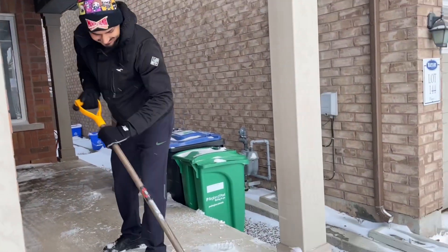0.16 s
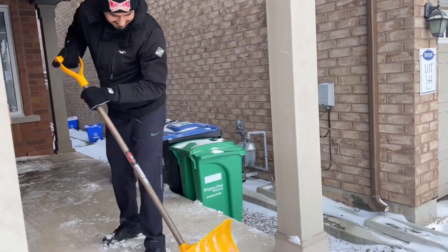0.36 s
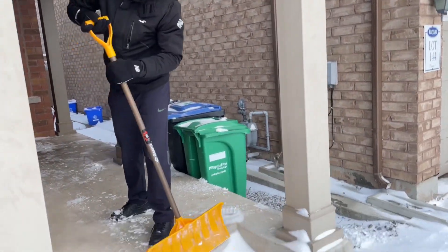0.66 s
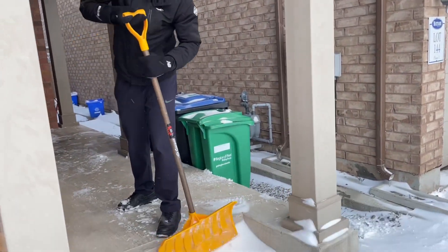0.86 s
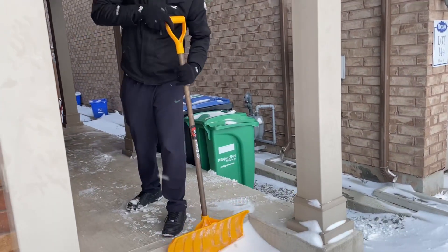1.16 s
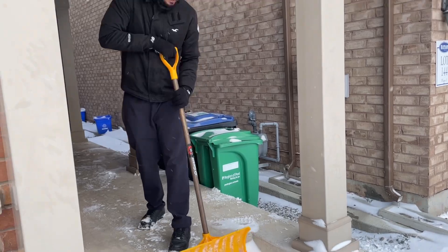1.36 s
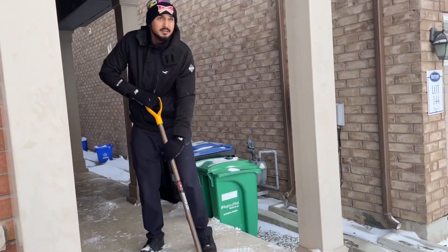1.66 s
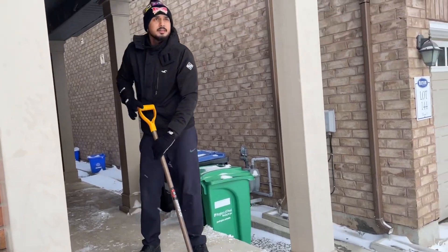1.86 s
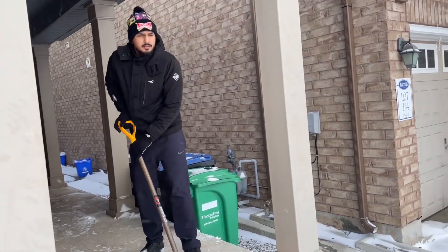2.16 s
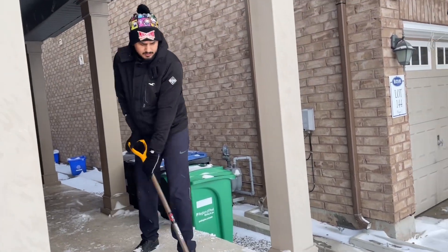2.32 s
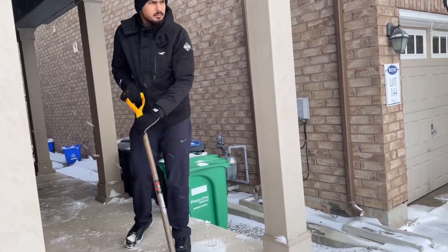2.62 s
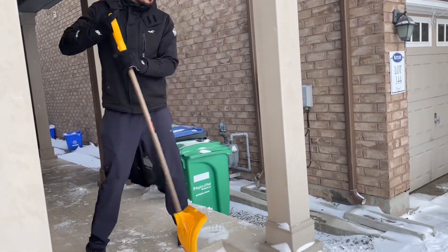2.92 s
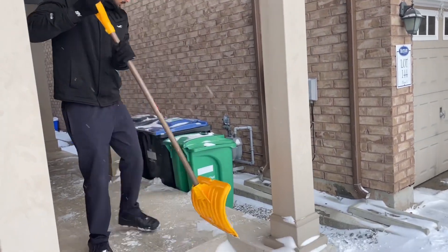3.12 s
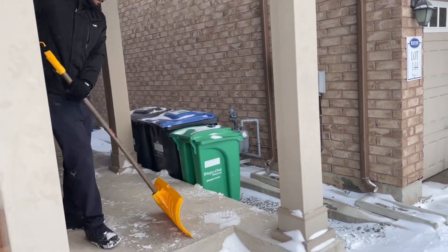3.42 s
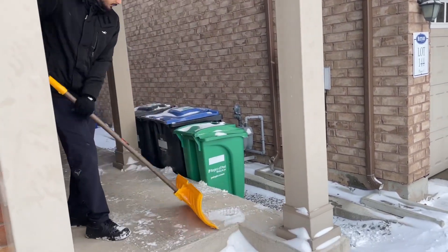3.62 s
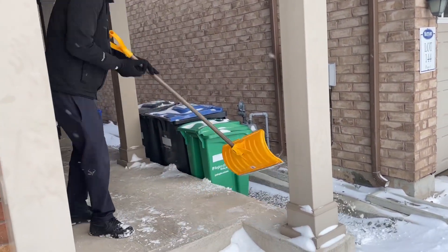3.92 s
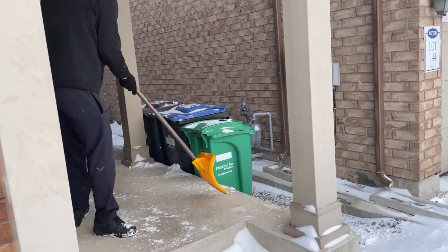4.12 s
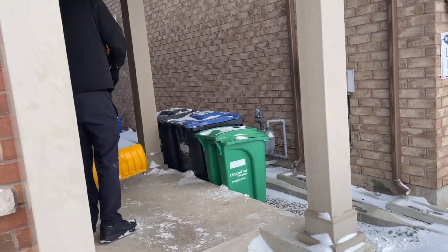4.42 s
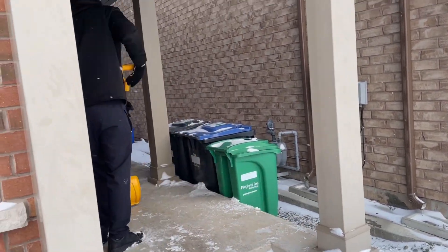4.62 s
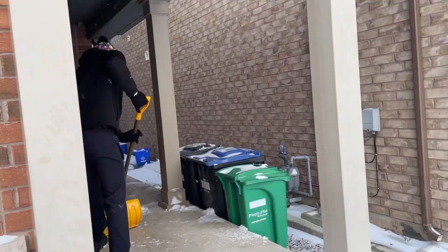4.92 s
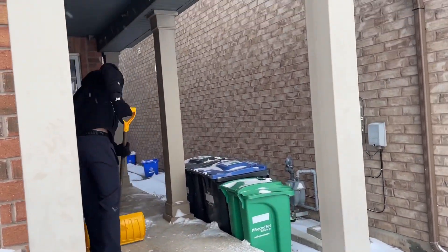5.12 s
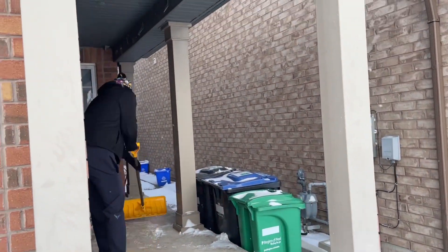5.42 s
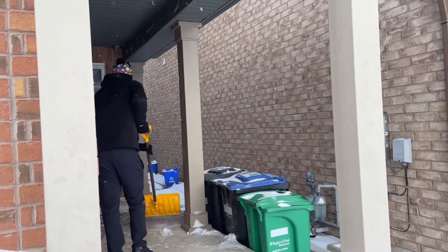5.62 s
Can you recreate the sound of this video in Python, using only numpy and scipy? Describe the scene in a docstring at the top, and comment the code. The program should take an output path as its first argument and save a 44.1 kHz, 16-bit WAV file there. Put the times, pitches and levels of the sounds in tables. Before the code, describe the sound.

Wind rumbles, flutters and pops on the microphone from the start, strongest in the first second, then returning in weaker gusts. At about 0.6 seconds a plastic snow shovel hits icy concrete with a sharp, bouncing clatter, and knocks again at 0.8. Short gritty scrapes and clacks follow near 1.5, 2.3 and 2.9 seconds. A knock at 3.4 leads into a longer, brighter scrape until about 3.8. The lifted scoop hums briefly after these last two strokes. Another knock comes at 4.1, then a run of lighter hollow taps from 4.5, running into scrapes around 4.8 and 5.2 to 5.4. A last clack and short scrape land at 5.7. The brick walls of the porch add a brief, slight echo. In the background lies a faint street hush, with small hanging metal parts tinkling far off, mostly in the first half.

```python
"""A plastic snow shovel knocks, bounces and scrapes in short strokes over gritty ice on a concrete porch.
Blows and catching grit make the blade ring, the lifted scoop hums, and brick walls echo briefly.
Gusts of wind rumble, flutter and pop on the microphone.
Far off, small hanging metal parts tinkle over the hush of a street."""
import sys
import numpy as np
from scipy import signal
from scipy.fft import rfft, irfft, next_fast_len
from scipy.io import wavfile
from scipy.ndimage import uniform_filter1d, map_coordinates

SR = 44100
rng = np.random.default_rng(int(sys.argv[2]) if len(sys.argv) > 2 else 0)


def dump_mix(stems):
    """Bounce the given channels to the path in sys.argv[1] as a 16-bit WAV at rate SR."""
    frames = np.atleast_2d(stems).T  # one column per channel
    limited = np.clip(frames, -1, 1)  # hard clip at full scale
    pcm = np.round(limited * 32767).astype(np.int16)
    wavfile.write(sys.argv[1], SR, pcm)


N = 254456


def amp(db):
    """Turn decibels into a factor to multiply by."""
    return 10 ** (np.asarray(db) / 20)


def unit(x):
    """Scale a signal to an average power of 1."""
    return x / np.sqrt(np.mean(x ** 2) + 1e-20)


def along(points, hz):
    """Read between (frequency, value) points on a log frequency axis."""
    freqs, values = np.transpose(points)
    return np.interp(np.log(hz + 1), np.log(freqs + 1), values)


def wobble(rate):
    """A smooth random curve for each channel, mostly shared; rate is random points per second."""
    knots = rng.standard_normal((3, int(N * rate / SR) + 4))
    shared, left, right = (map_coordinates(k, [np.arange(N) * rate / SR]) for k in knots)
    return 0.66 * shared + 0.46 * np.array([left, right])


def filtered(x, response):
    """Multiply each frequency in x by response(hz)."""
    size = next_fast_len(N + SR // 2)
    return irfft(rfft(x, size) * response(np.fft.rfftfreq(size, 1 / SR)), size)[..., :N]


def stereo_noise(likeness):
    """White noise from rows of (frequency [Hz], left-right likeness [0 to 1])."""
    def mid_and_side(hz):
        angle = np.arccos(np.clip(along(likeness, hz), -1, 1)) / 2
        return np.array([np.cos(angle), np.sin(angle)])
    mid, side = filtered(rng.standard_normal((2, N)), mid_and_side)
    return np.array([mid + side, mid - side])


def street_hush():
    """Far street noise, gently unsteady."""
    # tone of the street: (frequency [Hz], level [dB])
    spectrum = [(30, 0.5), (60, -11.5), (140, 6), (300, -9.5), (600, -20), (1200, -15), (1800, -23.5),
                (1950, -11.5), (2100, -25), (3000, -28), (4500, -36), (8000, -46), (12500, -38.5),
                (15000, -39.5)]
    # how alike the two sides sound: (frequency [Hz], likeness [0 to 1])
    likeness = [(60, 0.31), (300, 0.34), (640, 0.25), (1400, 0.18), (7000, 0.036), (15000, 0.41)]
    level = amp(-53 + 3.7 * wobble(1))
    return level * unit(filtered(stereo_noise(likeness), lambda hz: amp(along(spectrum, hz))))


def metal_tinkle():
    """Hanging metal parts touch in the wind; each touch rings one thin tone from its own side."""
    # metal parts: (pitch [Hz], time to fade 60 dB [s], touches as (time [s], level [dB]))
    parts = [(1870, 2, [(0, -67), (.5, -67), (2.56, -67), (4.25, -64)]), (2820, 2, [(0, -72), (.45, -71)]),
             (3410, 1.1, [(0, -66.5), (.36, -69), (.51, -66), (.86, -64), (1.29, -69), (1.67, -68),
             (1.97, -71), (3.105, -70), (3.2, -68)]), (5000, 0.65, [(.73, -55), (.85, -56), (1.81, -66),
             (2.745, -77), (4.4, -73.5)]), (6530, .33, [(0, -56.5), (.915, -46.5), (2.975, -60),
             (4.212, -63)]), (8810, .4, [(.52, -73.5), (1.15, -62), (3.11, -64)])]
    out, t = np.zeros((2, N + SR)), np.arange(SR) / SR
    attack = 1 - np.exp(-t / 0.0026)
    for hz, t60, touches in parts:
        for start, db in touches:
            pan_db, phase = rng.standard_normal(2)
            level = amp(db - 60 * t / t60 + [[pan_db], [-pan_db]]) * attack
            out[:, round(start * SR):][:, :SR] += level * np.sin(2 * np.pi * hz * t + [[0], [phase]])
    return out[:, :N] * amp(4.5 * wobble(40))  # the swinging parts waver


def wind_gusts():
    """Swirls of air press on the microphone in lumps: a low rumble and a higher flutter."""
    # gusts: (time at full strength [s], hold [s], rumble [dB], flutter [dB])
    gusts = [(0.003, 0.046, -20, -20), (0.075, 0.13, -30.5, -32), (0.207, 0.035, -26, -29.5),
             (0.315, 0.036, -21.5, -25.5), (0.442, .01, -33, -39.5), (0.507, 0.038, -32.5, -43),
             (0.604, .05, -26, -19.5), (0.685, .05, -29, -30.5), (0.752, 0.11, -22, -21),
             (0.961, 0.044, -19.5, -22.5), (1.073, 0.021, -29.5, -39.5), (1.145, 0.037, -41, -49.5),
             (1.331, 0.15, -41, -48.5), (1.468, 0.024, -41, -31.5), (1.613, .13, -32.5, -25.5),
             (1.78, 0.078, -44, -36.5), (1.872, 0.012, -31.5, -41), (2.011, 0.054, -36.5, -30),
             (2.134, .09, -45, -35), (2.447, 0.073, -25.5, -27), (2.551, 0.069, -44.5, -44.5),
             (2.664, 0.19, -37.5, -30.5), (2.954, 0.049, -52, -41), (3.056, .03, -35, -46.5),
             (3.151, 0.061, -48.5, -50), (3.257, 0.0054, -33.5, -28.5), (3.319, 0.078, -37.5, -29.5),
             (3.463, 0.053, -32.5, -38), (3.574, 0.037, -31.5, -29), (3.664, 0.02, -51, -47),
             (4.17, 0.0081, -48.5, -52.5), (4.396, 0.044, -38.5, -40), (4.634, 0.0057, -31.5, -37),
             (4.737, .07, -38.5, -37), (5.506, 0.022, -59, -63), (5.651, 0.016, -49.5, -67),
             (5.732, 0.052, -45.5, -42)]
    # tone of the rumble and of the flutter: (frequency [Hz], level [dB])
    rumble_tone = [(15, -53.5), (35, -4.5), (55, 11.5), (110, 12), (160, 12.5), (250, -30), (400, -48),
                   (800, -120)]
    flutter_tone = [(90, -25.5), (180, 5), (300, -3.5), (450, -7.5), (700, -25.5), (1200, -46.5),
                    (2500, -120)]
    rise_db_per_s, fall_db_per_s = 590, 394
    t, power = np.arange(N) / SR, 0
    for full, hold, rumble_db, flutter_db in gusts:
        drop_db = rise_db_per_s * np.maximum(full - t, 0) + fall_db_per_s * np.maximum(t - full - hold, 0)
        power += amp([[rumble_db], [flutter_db]] - drop_db) ** 2
    level = uniform_filter1d(np.sqrt(power), size=400, axis=1)
    rumble = level[0] * unit(stereo_noise([(60, 0.83)]) * amp(4.1 * wobble(28)))
    flutter = level[1] * unit(stereo_noise([(60, 0.67)]) * amp(4.9 * wobble(50)))
    return (filtered(rumble, lambda hz: unit(amp(along(rumble_tone, hz))))
            + filtered(flutter, lambda hz: unit(amp(along(flutter_tone, hz)))))


def wind_pops():
    """The strongest swirls pop on the microphone with a falling pitch."""
    # pops: (time [s], level [dB], pitch [Hz])
    pops = [(0.026, -20, 360), (0.056, -34, 350), (0.088, -25, 307), (0.117, -18.5, 283),
            (0.144, -20.5, 316), (0.2, -16.5, 325), (0.305, -5, 545), (0.321, -18.5, 480),
            (0.341, -11.5, 301), (0.453, -22.5, 294), (0.962, -11.5, 343), (1.614, -18, 295),
            (1.729, -17, 350), (2.028, -23.5, 370), (2.443, -21, 320), (2.746, -18.5, 330),
            (4.427, -21, 192), (4.62, -39, 280)]
    out, lead = np.zeros((2, N)), SR // 50
    t = np.arange(-lead, SR // 25) / SR
    for time, db, hz in pops:
        cycles = t * hz
        level = amp(db) * np.exp(-np.where(cycles < 0, 1.9 * cycles ** 2, 1.4 * cycles))
        pop = level * np.sin(2 * np.pi * (cycles - 0.045 * cycles * np.abs(cycles)))
        pan = amp(rng.normal(0, 8.1) * np.array([[0.5], [-0.5]]))
        out[:, round((time + 0.003) * SR) - lead:][:, :len(t)] += pop * pan
    return out


# The shovel sounds in five bands, low to high: hollow, boom, grind, rasp, fizz.
def drag_power():
    """Power in each band as the blade drags lightly through loose snow."""
    # dragging: (time [s], grind [dB], boom over grind [dB])
    drags = [(0.02, -67, -2), (0.222, -54, -12), (0.58, -74, 8), (0.634, -39, 18), (0.758, -42, -6),
             (0.83, -32, -10), (0.9, -38, -5.5), (1.14, -56, -1), (1.21, -54, 6.5), (1.27, -60, -1),
             (1.37, -54, 7.5), (1.6, -49.5, 7), (1.7, -48, -5), (1.866, -59, -15), (2.0, -54, -11),
             (2.19, -67, 4), (2.584, -64.5, 2), (2.8, -92, 19), (3.0, -57, 1), (3.064, -70, 0),
             (3.274, -53.5, -12), (3.4, -61.5, 7), (3.86, -48, -7), (4.06, -77, 10), (4.46, -65.5, -10),
             (4.5, -53, -5), (4.62, -54, -19), (4.732, -44.5, 6), (5.05, -60.5, 7), (5.45, -43, -10.5),
             (5.572, -49, -14), (5.68, -66, -1)]
    times, *columns = np.transpose(drags)
    grind_db, boom_db = (np.interp(np.arange(N) / SR, times, column) for column in columns)
    fizz_db = (0.84 - 1) * (grind_db - grind_db.mean()) - 11  # fizz gains 0.84 dB per dB of grind
    bands_db = np.array([boom_db - 8, boom_db, np.full(N, -3.5), np.full(N, -13), fizz_db])
    return amp(grind_db + bands_db) ** 2


def patchy(x):
    """Narrow random patches of pitch swell and fade in the scrape, alike on both channels."""
    spectrum = signal.stft(x, nperseg=1024)[2]
    patches = uniform_filter1d(rng.standard_normal(spectrum.shape[1:]), size=2, axis=0)
    patches = uniform_filter1d(patches, size=8, axis=1)  # narrow in pitch, slow in time
    return signal.istft(spectrum * amp(2.5 * unit(patches)), nperseg=1024)[1][:, :N]


def resonances(table, top_hz):
    """A filter that rings at the pitches in the table and dulls above top_hz."""
    def response(hz):
        ringing = sum((-1) ** k * amp(db) * 1j * hz * width / (pitch ** 2 - hz ** 2 + 1j * hz * width)
                      for k, (pitch, width, db) in enumerate(table))
        return ringing / (1 + 1j * hz / top_hz) ** 2
    return response


def shovel():
    """Grit catches the edge in dense, uneven grains that ring the blade; blows ring it at once."""
    # resonances of the scoop, bending blade, edge and ribs: (pitch [Hz], width [Hz], level [dB])
    hollow = [(195.3, 51, -8), (291.3, 82, 2.5), (381, 167, 1)]
    boom = [(550, 110, -5.5), (667.3, 44.4, 3.5), (743, 70, 0), (800, 53, 2.5), (950, 106, -5)]
    grind = [(1060, 204, 5), (1249, 20.6, 4.5), (1247, 254, 1.5), (1457, 22, 7), (1536, 69, 2),
             (1736, 98, 9), (1987, 610, 3.5)]
    rasp = [(2244, 71, -1), (2415, 76, 5.5), (2670, 290, 2), (3023, 110, 3.5), (3233, 68, 2),
            (3377, 69, -0.5), (3590, 640, -7)]
    # tone of the ice: (frequency [Hz], level [dB])
    fizz = [(2000, -33.5), (3500, 2), (5200, 1), (6500, -1.5), (8500, -5), (10000, -1), (12300, -5.5),
            (14300, -14.5), (15600, -33)]
    # how alike the two sides sound: (frequency [Hz], likeness [0 to 1])
    likeness = [(300, 0.88), (640, 0.59), (1400, 0.08), (3000, 0.23), (7000, 0.33), (15000, 0.63)]
    # stereo balance: (frequency [Hz], left over right [dB])
    balance = [(300, -0.5), (700, 2.5), (1300, 2.5), (2400, -2.2), (4400, 3), (8000, -0.2)]
    right_delay_s = 0.00016
    crunch_power, blows = blade_knocks()
    force = np.sqrt(drag_power() + crunch_power + scrape_power())
    grit = amp(1.34 * wobble(250) + 1.05 * wobble(45))
    bands = [resonances(hollow, top_hz=490), resonances(boom, top_hz=900), resonances(grind, top_hz=4300),
             resonances(rasp, top_hz=7500), lambda hz: amp(along(fizz, hz))]
    blade = 0
    for push, blow, band in zip(force, blows, bands):
        grains = unit(grit * patchy(stereo_noise(likeness)))
        blade += filtered(push * grains + blow, band) / np.std(filtered(grains, band))
    return filtered(blade, lambda hz: amp(along(balance, hz) * [[0.5], [-0.5]])
                    * np.exp(-2j * np.pi * hz * [[0], [right_delay_s]]))


def wall_echo(x):
    """Brick walls answer briefly, each frequency dying at its own speed."""
    # echo of the porch: (frequency [Hz], time to fade 60 dB [s])
    fade_times = [(200, 0.39), (1000, 0.19), (4000, 0.21), (12000, 0.2)]
    hz, t, noise = signal.stft(rng.standard_normal((2, SR // 2)), SR, nperseg=256)
    tail = signal.istft(noise * amp(-60 * t / along(fade_times, hz)[:, None]), SR, nperseg=256)[1]
    return signal.fftconvolve(x, tail / np.linalg.norm(tail[0]), axes=1)[:, :N]


def blade_knocks():
    """The blade hits the ground: the power of the crunch and the sharp blows, in each band."""
    # knocks: (time [s], level [dB], hollow [dB], boom [dB], treble [dB], snow crunch before the blow [dB],
    # base fade time [s]); the four dB columns after level add to it
    knocks = [(0.5881, -8, -34, -1.5, -4, -51, 0.1), (0.6, -12, -28.5, 2, -4.5, -20, 0.16),
              (0.6104, -14.5, -4.5, -2, -21, -24, .12), (0.6407, -22.5, -6, 7.5, 3, -27, .061),
              (0.6504, -31.5, -6, 7, -2, -33.5, .079), (0.6723, -16, -5, -11, 2, -24, 0.063),
              (0.8135, -12, -12.5, -6.5, 0, -35, 0.056), (0.8214, -24.5, 5.5, 5, -12, -23, .09),
              (0.8344, -31, -7, 0, 11.5, -31, .05), (1.0434, -39, -4, 6, 2, -29, 0.071),
              (1.3972, -34, 2.5, -6, 0.5, -25, 0.25), (1.4456, -22, 2, 1.5, -1, -25, 0.026),
              (1.4875, -39, 10.5, -7, 6.5, -25, 0.04), (1.5267, -33, -18, -1, -7, -20, 0.039),
              (1.5542, -18, -12, -18, -1.5, -23.5, .056), (1.9066, -47.5, 9, -1, 9.5, -10, 0.49),
              (1.9827, -45, 8, -2, 7, -23, 0.072), (2.0243, -55.5, 0, -3, 13.5, -25, .06),
              (2.0657, -49.5, -3, 2, 8, -33, 0.059), (2.1958, -41.5, 15, 8, 1.5, -27, 0.13),
              (2.2167, -35, 0, 6.5, 1, -32, 0.1), (2.2613, -32, 4, 11.5, -11, -18, 0.078),
              (2.4626, -24, 1, -1, 5.5, -7, 0.056), (2.8644, -28, -13, -2.5, 4.5, -25, 0.083),
              (2.9137, -16, -7.5, -5, 5.5, -9, .09), (3.0694, -56.5, -3, -1, 10, -1, 0.12),
              (3.262, -57, 0, -1, 13.5, -8, .1), (3.4319, -11.5, -16, -10.5, 6.5, -6, 0.029),
              (3.4865, -30.5, -2, -5, 10.5, -13, 0.11), (3.607, -31, 0, 1.5, 10.5, -26, 0.16),
              (3.9741, -53.5, -1, -14.5, 7.5, -29, 0.14), (4.086, -17, -5.5, -8, 2, -0.5, 0.072),
              (4.2118, -55.5, -7, -6, 10, -21, 0.35), (4.3694, -61, -5, -3, 11.5, -21, 0.19),
              (4.5452, -23, 2.5, -1.5, 3.5, -11, .12), (4.6552, -28, -2, 0, 3, -8, 0.13),
              (4.6752, -26, -1, -0.5, 1.5, -21, 0.13), (4.7125, -28, 2, -1, -1, -23, 0.094),
              (4.7435, -31.5, 4, 0, -13, -25, 0.17), (4.8202, -31, 8, 0, -3, -28, 0.12),
              (5.068, -45.5, 11.5, 4, -7, -25, 0.13), (5.139, -49.5, 0, -1.5, 13.5, -25, .06),
              (5.7249, -16.5, -24, -24, -2.5, -19, .097)]
    # boost of the sharp blow in each band: (level [dB])
    clack_db = [20.2, 22.3, 19, 22, 19.97]
    fade_share = np.array([[1.4], [1.2], [1], [0.8], [0.55]])  # the treble dies first
    t = np.arange(N) / SR
    power, blows = np.zeros((2, 5, N))
    for time, db, hollow_db, boom_db, treble_db, snow_db, fade in knocks:
        span = slice(round((time - 0.05) * SR), round((time + 0.3) * SR))
        age = t[span] - time
        # a bright blow gains more fizz than rasp
        gain = amp(db + np.array([[hollow_db], [boom_db], [0], [treble_db - 12.5], [1.35 * treble_db - 14]]))
        rise = amp(snow_db) * np.exp(np.minimum(age, 0) / 0.0071)
        fall = amp(-60 * np.maximum(age, 0) / (fade * fade_share))
        power[:, span] += (gain * amp(-4.5) * np.where(age < 0, rise, fall)) ** 2
        blows[:, round(time * SR)] = gain[:, 0] * amp(clack_db)
    return power, blows


def scrape_power():
    """Power in each band as the blade slides over ice: each stroke swells, holds and lets go."""
    # strokes: (start [s], swell [s], hold [s], base release time [s], grind [dB], hollow [dB], boom [dB],
    # rasp [dB], fizz [dB]); the last four add to grind
    strokes = [(1.42, 0.029, 0.0015, 0.038, -33, 3.5, 1, -8, -7.5),
               (1.529, 0.024, 0.0025, 0.07, -22.5, -4, -1, -8, -7),
               (2.198, 0.031, .005, 0.16, -46, 0, 14.5, -5, 1.5),
               (2.249, 0.039, 0.072, 0.05, -24.5, 3.5, 8.5, -5.5, -5),
               (2.839, 0.025, 0.0027, 0.037, -29, 0, -1, -10, -14),
               (3.403, .027, 0.0023, 0.11, -24, -3.5, -4, -4, -5),
               (3.516, 0.035, 0.086, 0.12, -42, 6, -2, -2.5, -2),
               (3.582, .11, 0.071, 0.15, -22, -6, -1, -0.5, -2),
               (4.802, 0.043, 0.071, 0.31, -29, 7.5, 4.5, -6.5, -10.5),
               (5.056, 0.016, 0.14, 0.2, -52.5, 18.5, 8.5, -15, -5),
               (5.151, 0.06, 0.049, .1, -34, 13, 8.5, -9, -8),
               (5.207, 0.046, .14, 0.13, -22, 3.5, 4, -3, -5.5),
               (5.701, 0.03, 0.0028, 0.083, -25.5, 9, 6.5, -2, -2)]
    # how force grows with time in each band, higher is later: (exponent [no unit])
    swell_curve = [
        [1],
        [1.5],
        [1.1],
        [1.32],
        [1.28],
    ]
    # change in each band along a stroke, the low ones giving way: (slope [dB/s])
    slopes = [
        [-89],
        [-56],
        [-0.5],
        [-1.5],
        [-10],
    ]
    # release of each band, the treble letting go first: (share of release time [no unit])
    release_share = [
        [1.04],
        [0.87],
        [0.86],
        [0.7],
        [0.7],
    ]
    t, power = np.arange(N) / SR, 0
    for start, swell, hold, release, db, hollow_db, boom_db, rasp_db, fizz_db in strokes:
        age = t - start
        rise = np.clip(age / swell, 0, 1) ** swell_curve
        sag = amp(slopes * np.clip(age, 0, swell + hold))
        fall = amp(-60 * np.maximum(age - swell - hold, 0) / (release * np.array(release_share)))
        gain = amp(db + np.array([[hollow_db], [boom_db], [0], [rasp_db], [fizz_db]]))
        power += (gain * rise * sag * fall) ** 2
    return power


def scoop_hum():
    """One low tone rings on freely once the blade leaves the ground."""
    # hums of the lifted scoop: (time [s], level [dB])
    hums = [(2.919, -24), (3.756, -25)]
    pitch_hz, attack_s, fade_s = 278.4, 0.01, 0.2
    out, t = np.zeros(N), np.arange(SR // 2) / SR
    for start, db in hums:
        level = amp(db - 60 * t / fade_s) * (1 - np.exp(-t / attack_s))
        out[round(start * SR):][:len(t)] += level * np.sin(2 * np.pi * pitch_hz * t)
    return out


def scene():
    """The shovel and its echo, mixed with wind, street and metal."""
    tool = shovel() + scoop_hum()
    return tool + amp(-15) * wall_echo(tool) + wind_gusts() + wind_pops() + street_hush() + metal_tinkle()


def record(dry):
    """The level drops out once, briefly, and comes back in two steps; the highest treble is cut off."""
    # steps of the dip in level: (start [s], end [s], change [dB])
    dip_steps = [(1.212, 1.236, -25), (1.235, 1.268, -8)]
    top_hz = 15750
    t = np.arange(N) / SR
    dip_db = sum(db * ((t > start) & (t < end)) for start, end, db in dip_steps)
    return filtered(dry * amp(uniform_filter1d(dip_db, size=90)), lambda hz: hz < top_hz)


dry = scene()
out = record(dry)
dump_mix(out)
```